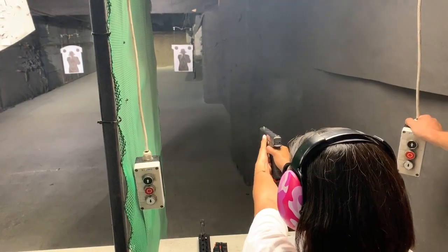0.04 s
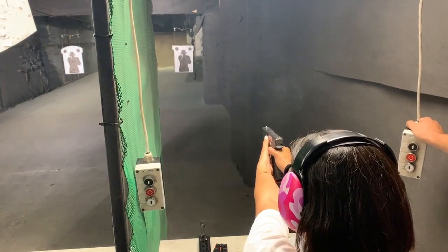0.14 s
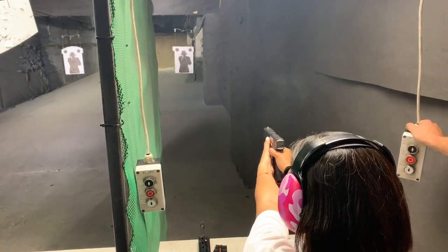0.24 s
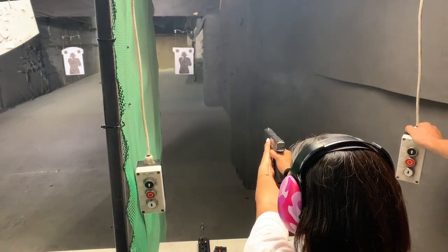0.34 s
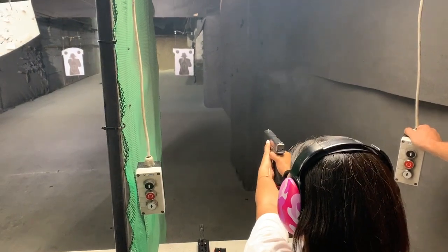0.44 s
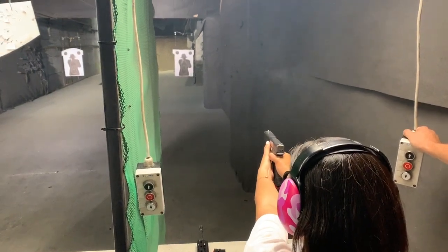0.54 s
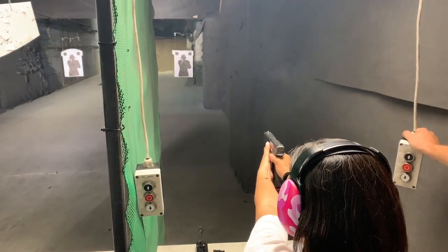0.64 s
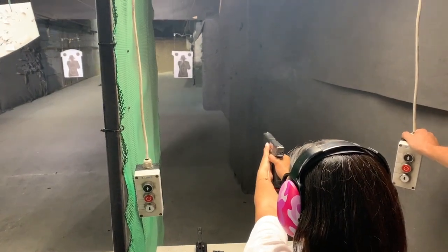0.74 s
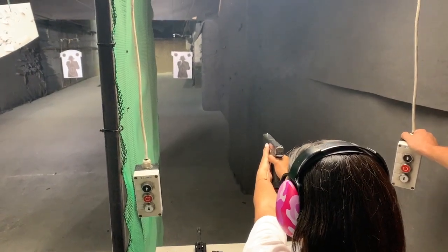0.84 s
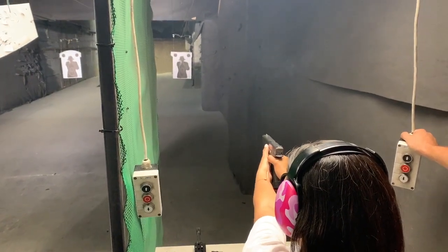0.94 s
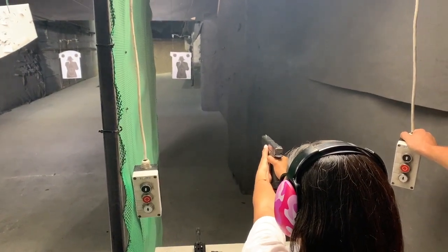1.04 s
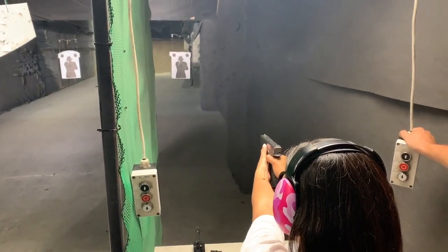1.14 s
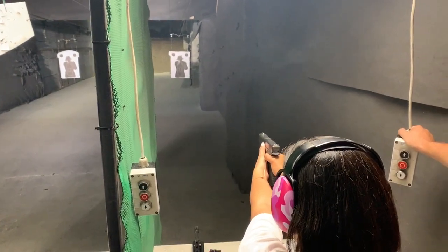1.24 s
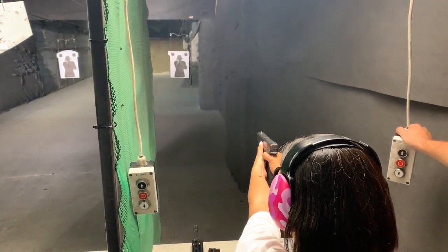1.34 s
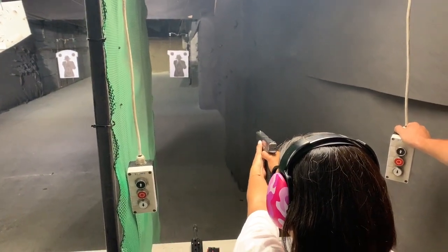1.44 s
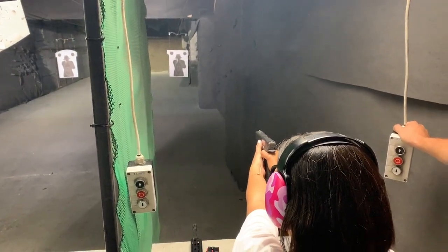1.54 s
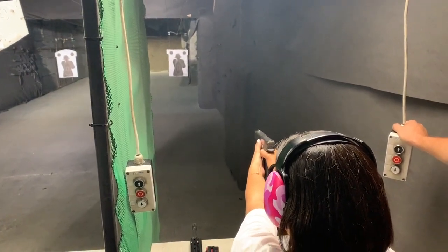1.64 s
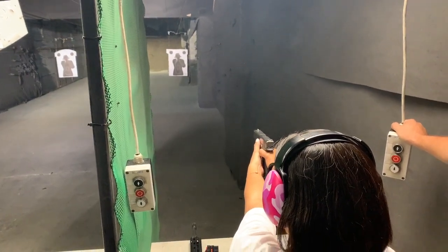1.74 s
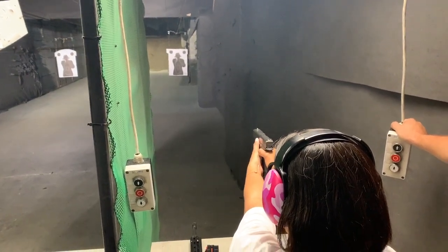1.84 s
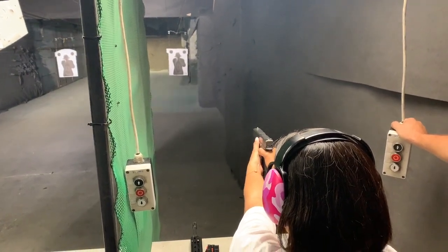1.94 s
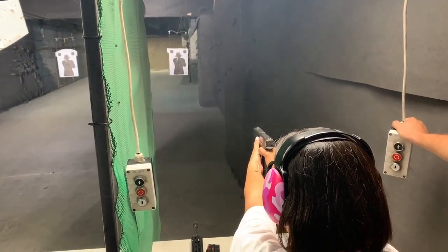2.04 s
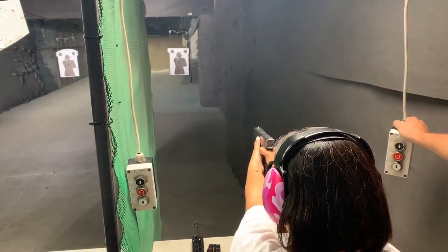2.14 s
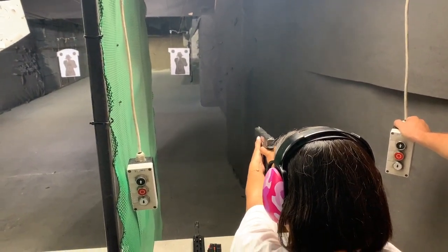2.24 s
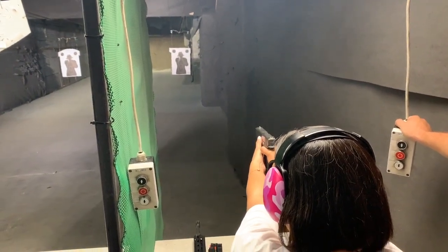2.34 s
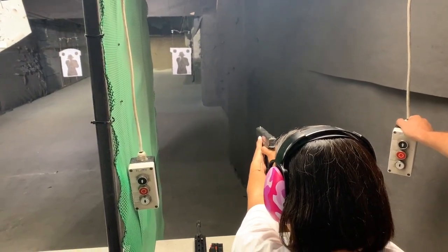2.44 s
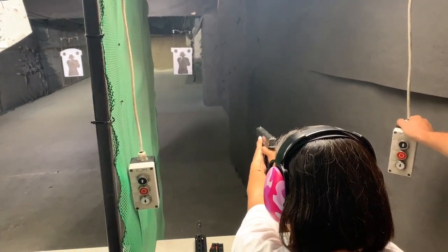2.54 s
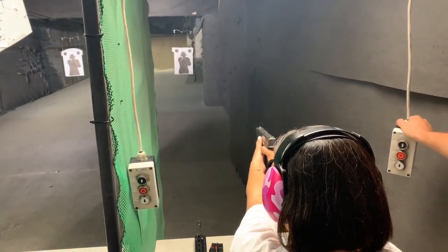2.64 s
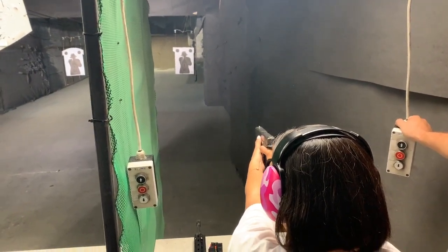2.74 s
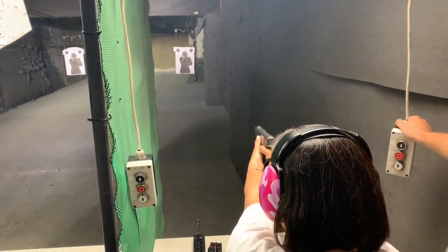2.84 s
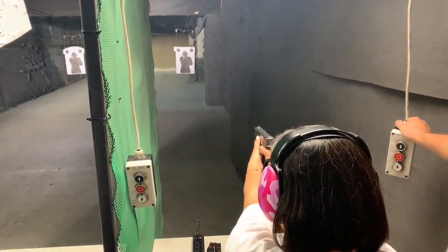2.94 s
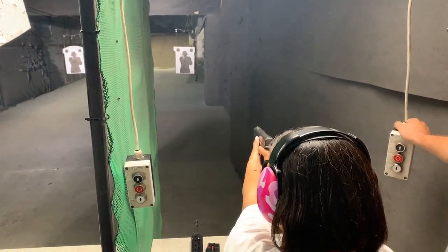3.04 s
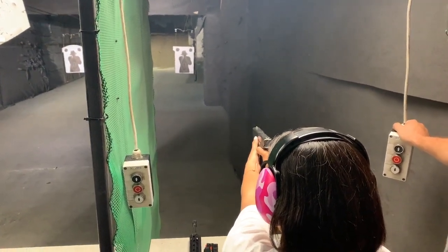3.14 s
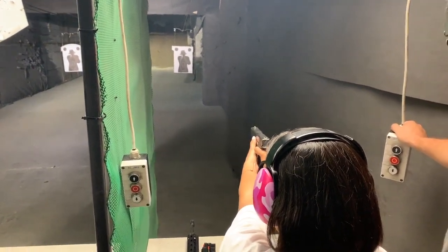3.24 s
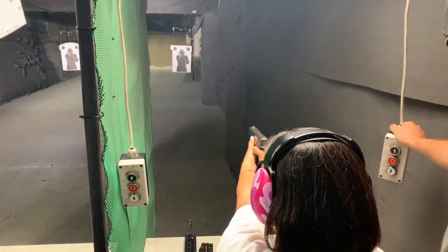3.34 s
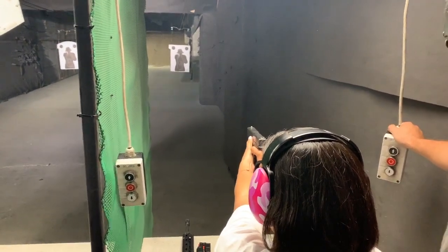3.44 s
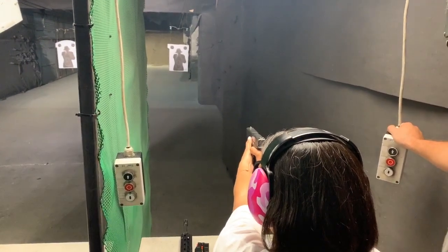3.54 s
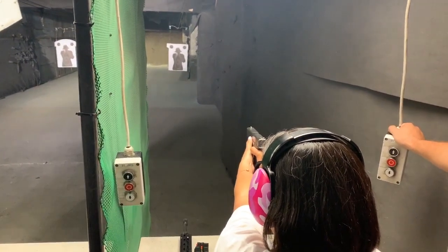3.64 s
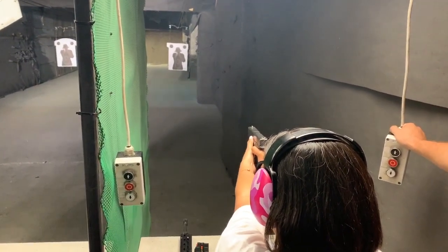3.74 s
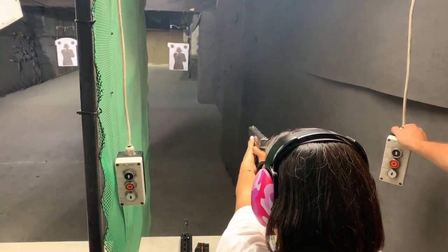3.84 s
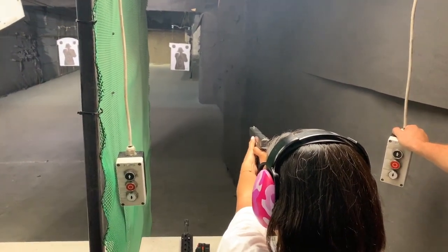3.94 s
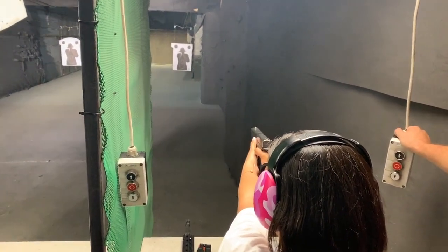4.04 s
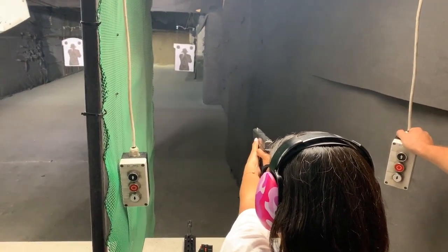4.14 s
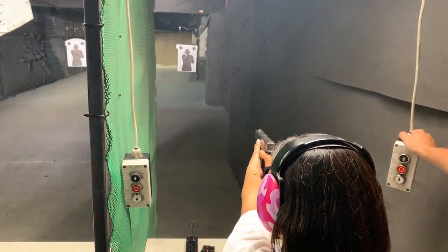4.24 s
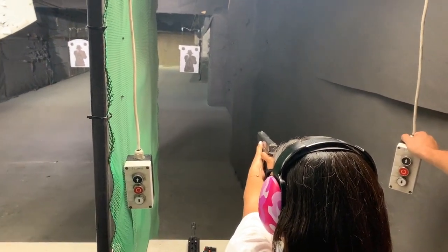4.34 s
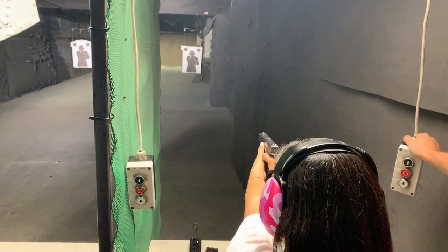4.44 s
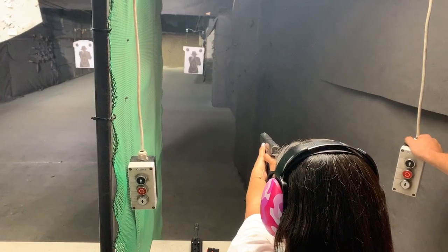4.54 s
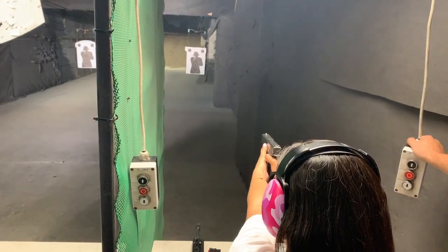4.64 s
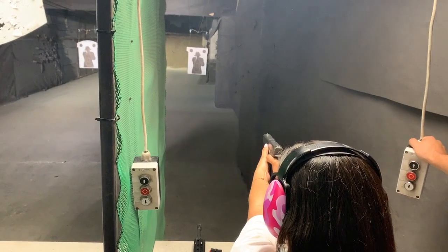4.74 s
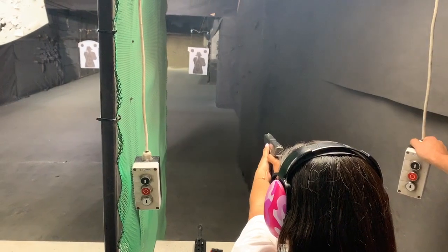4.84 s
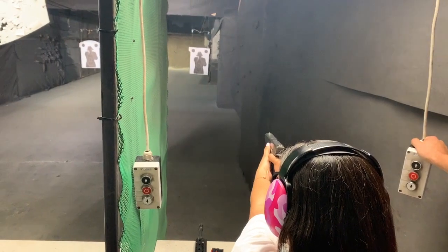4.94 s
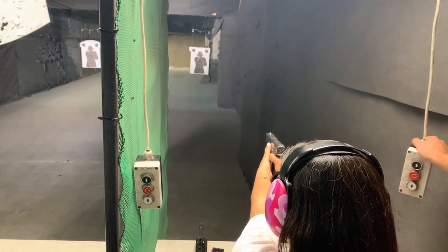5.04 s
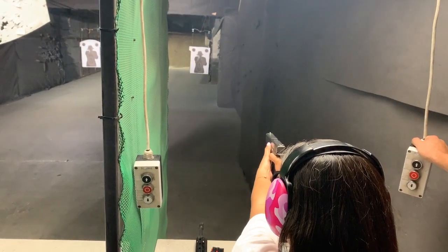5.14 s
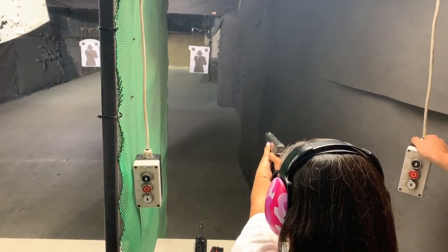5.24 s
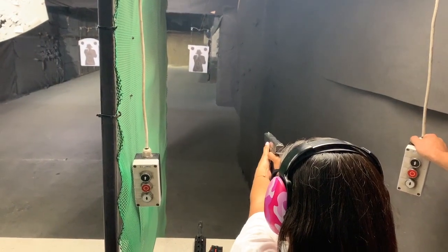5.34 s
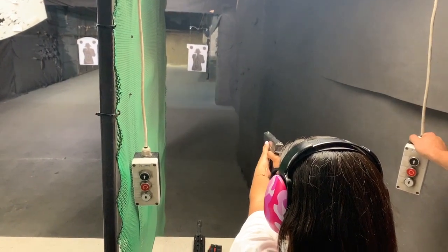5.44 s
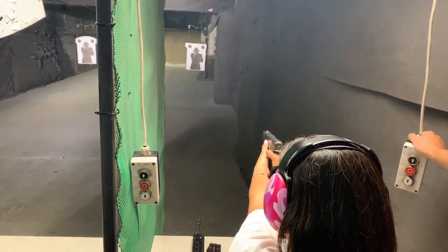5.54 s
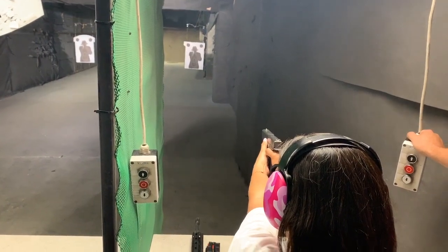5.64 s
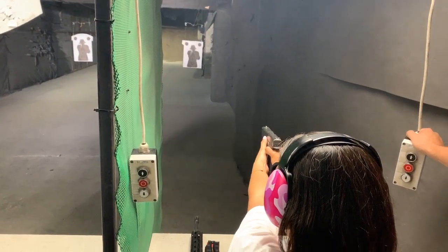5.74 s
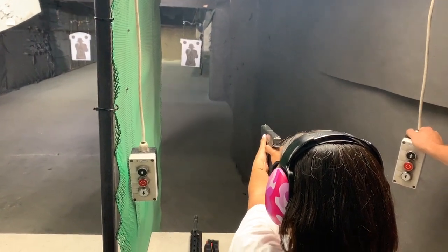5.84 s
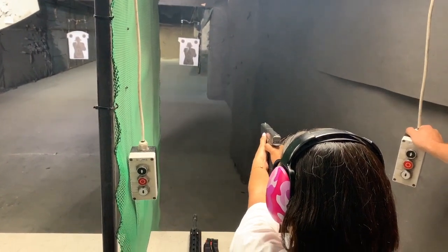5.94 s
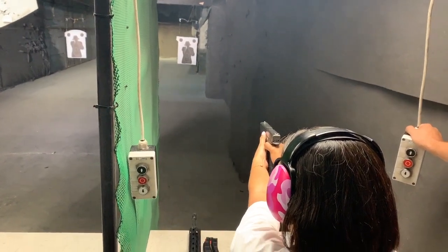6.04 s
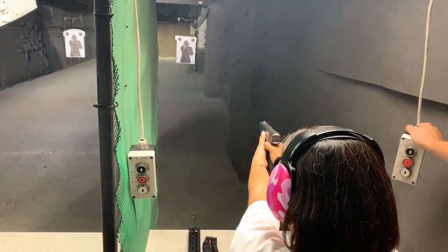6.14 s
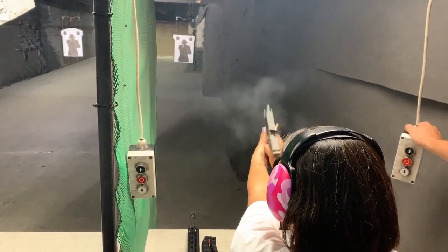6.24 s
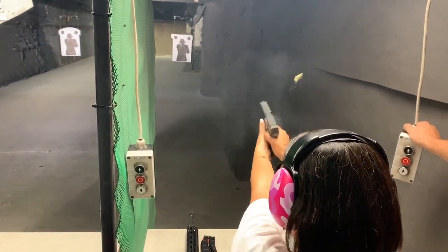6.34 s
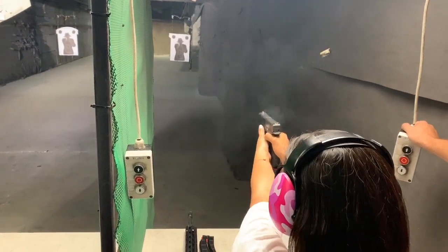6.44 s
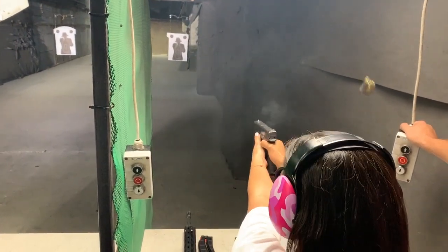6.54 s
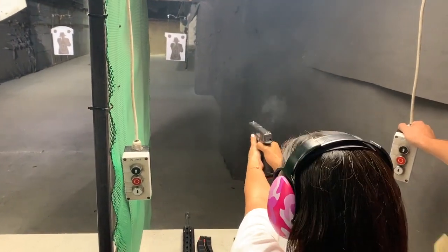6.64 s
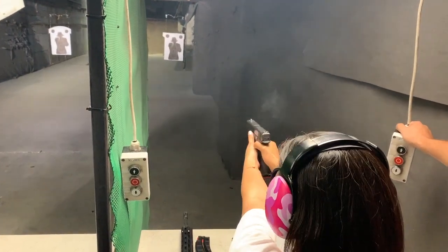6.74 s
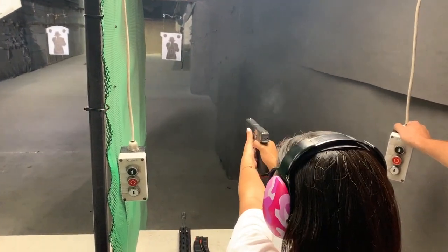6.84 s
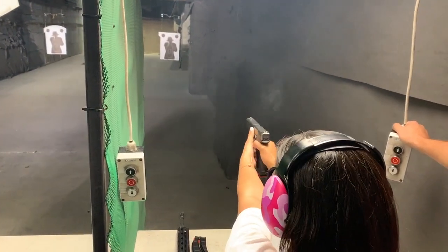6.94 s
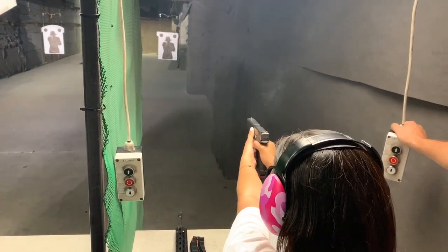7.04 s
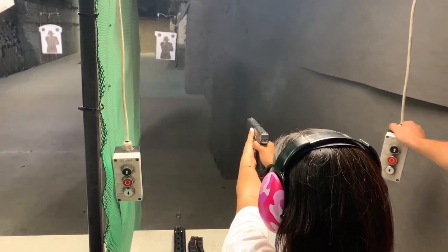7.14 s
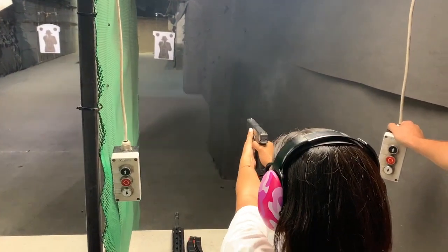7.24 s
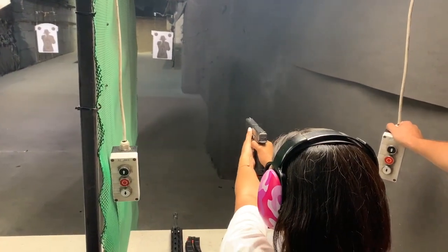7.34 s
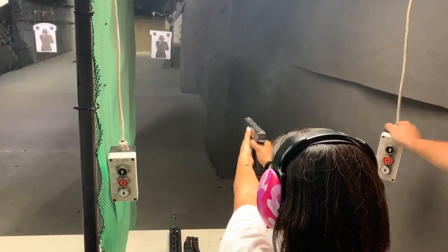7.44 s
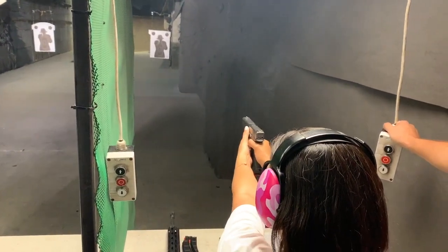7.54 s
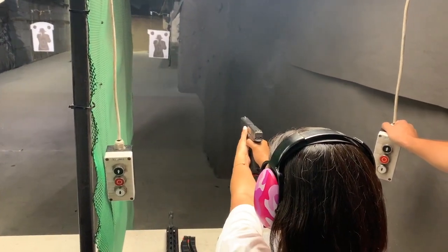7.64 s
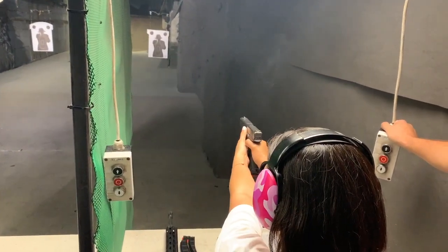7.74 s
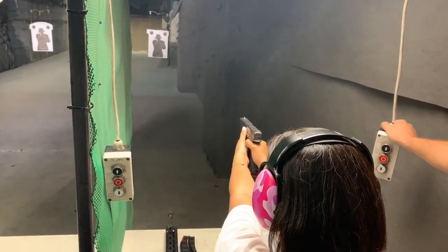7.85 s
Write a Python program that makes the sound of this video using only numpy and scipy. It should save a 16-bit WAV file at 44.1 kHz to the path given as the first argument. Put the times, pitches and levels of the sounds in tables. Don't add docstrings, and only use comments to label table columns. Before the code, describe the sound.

Pistol shots crack and overload the microphone in an indoor concrete range, each rolling into a hall echo, with brass cases tinkling over a low ventilation drone.

```python
import sys
import numpy as np
from scipy import signal
from scipy.fft import rfft, irfft
from scipy.io import wavfile
from scipy.ndimage import uniform_filter1d, minimum_filter1d

SR = 44100
rng = np.random.default_rng(int(sys.argv[2]) if len(sys.argv) > 2 else 0)


def undo_db(level):
    steps = np.asarray(level, float) / 20
    return 10 ** steps


def waveform_to_disk(signal):
    frames = np.transpose(np.atleast_2d(signal))
    scaled = np.clip(frames, -1, 1) * 32767
    samples = np.round(scaled).astype(np.int16)
    wavfile.write(sys.argv[1], SR, samples)


N = 348831

# f/Hz, level/dB per Hz
AIR_TONE = [(15, -29), (30, -12), (50, -4), (85, -6), (160, -1.5), (300, 2.5), (360, -7), (480, -14.5),
            (700, -13.5), (990, -22.5), (1130, -15), (2200, -24.5), (3200, -35), (9800, -51.5)]
# f/Hz, width/Hz, level/dB
DUCT_MODES = [(65, 12, -72), (113, 20, -62), (219, 18, -66.5), (278, 19, -59), (315, 17, -54.5),
              (530, 12, -75.5), (737, 18, -75), (910, 16, -80), (1180, 60, -78.5), (1670, 200, -77),
              (4000, 710, -80.5)]
# t/s, level over the lull/dB, length/s
AIR_SURGES = [(0.87, 8.5, 0.05), (1.16, 7.5, 0.094), (1.357, 10.5, 0.18), (1.92, 11, 0.22), (3.36, 7, 0.33),
              (3.67, 10.5, 0.14), (3.967, 8.5, 0.045), (4.39, 9.5, 0.087), (4.616, 5.5, 0.066),
              (5.152, 10.5, 0.17), (5.499, 6, 0.27), (5.79, 7.5, .12), (7.66, 12, 0.097)]
# f/Hz, likeness/0..1
PORT_LIKENESS = [(60, .93), (150, 1), (300, .88), (640, 0.3), (1400, 0.49), (2100, 0.6), (2750, 0.097),
                 (4100, .5), (4800, 0.76), (6200, 0.81), (7800, .93), (9200, .93), (10300, 0.41),
                 (11700, 0.89), (14000, 0.83)]
# f/Hz, level/dB
PORT_TILT = [(60, -2), (180, -1), (550, -2.5), (1650, -1), (4970, -1.0), (15000, 1)]
# t/s, level/dB, rise/s
BENCH_KNOCKS = [
    (0.7066, -34.5, 0.0073),
    (.7345, -45, 0.0032),
]
# f/Hz, level/dB, time to fall 60 dB/s
BENCH_MODES = [(1021, 2.5, 0.09), (1600, 9, 0.015), (1986, 8.5, 0.015), (2620, -7, 0.0106),
               (3499, -11, 0.0054), (4200, 0.5, .005), (5680, -6, 0.0037), (7500, -14, 0.0018)]
# t/s, tick level/dB, tick f/Hz, ring level/dB, ring f/Hz
BRASS_BOUNCES = [(.3620, -38, 4260, -52.5, 10550), (2.7470, -29, 8395, -36.5, 6050),
                 (2.7472, -36, 4200, -49, 4220), (3.289, -44, 9375, -47, 7450),
                 (3.2890, -44, 4100, -65, 11600), (3.634, -50, 4200, -56.5, 7480),
                 (3.791, -54.5, 3700, -72, 11530), (7.1614, -35, 13500, -47, 10850),
                 (7.4241, -36, 8340, -50, 7470), (7.4243, -46, 4330, -62, 4170),
                 (7.547, -51, 4000, -70, 10850), (7.575, -60.5, 11900, -49, 10870),
                 (7.707, -62, 8000, -74, 10800)]
# t/s, level/dB, time to fall 60 dB/s
PANEL_HIT = (2.7468, -25.5, 0.18)
# f/Hz, level/dB per Hz
PANEL_COLOUR = [(1500, -45), (2500, -22.5), (4200, -12), (5300, -12), (5900, 0), (6800, -7.5), (9900, -5.5),
                (11700, -9.5), (13000, -12), (15000, -10.5), (15900, -25)]
# f/Hz, level/dB per Hz
BOOTH_TONE = [(18, -50.5), (35, -27.5), (95, -11), (230, -8), (600, -9), (1000, -6.5), (2000, -11),
              (3000, -21.5), (4500, -16.5), (7400, -22), (10000, -24), (12600, -27.5), (15200, -32.5),
              (17000, -37.5)]
# f/Hz, fall/dB per s
BOOTH_DECAY = [(50, 117.5), (200, 94.5), (800, 110.5), (3000, 135), (8000, 161), (15000, 221.5)]
# f/Hz, level/dB per Hz
HALL_TONE = [(18, -50), (30, -23), (90, -4), (215, -6), (600, -3.5), (1320, -6.5), (2290, -14.5),
             (3200, -26), (4900, -25.5), (6900, -32), (9900, -48), (12000, -54), (14600, -64.5),
             (15600, -90)]
# f/Hz, fall/dB per s
HALL_DECAY = [(40, 24.5), (120, 29), (400, 43), (1400, 52.5), (3500, 58), (7000, 73.5), (11000, 110.5),
              (15000, 142.5)]
# settled level/dB, first level/dB, fill-up t/s, backstop echo level/dB, echo t/s
LANE_ANSWERS = [
    (-3.5, -11, .17, 2.5, .31),
    (-1, -1.5, .12, 6, .34),
]
# f/Hz, level/dB
FAR_BOOTH_COLOUR = [(300, -1), (1500, 1.5), (2300, 3), (2900, -2), (6000, -5), (10000, -1)]
# t/s, blast level/dB, lane (0 next, 1 own, 2 far booth), low hall mode level/dB, body thump level/dB
SHOT_LIST = [
    (-.5, -4, 2, -21, -9.5),
    (2.171, 1, 0, -34.5, -7),
    (6.2174, -0.5, 1, -30, -2.5),
    (6.611, 0, 0, -36, -5.5),
]


def evened(x):
    return x / np.sqrt(np.mean(x ** 2) + 1e-20)


def read(points, hz):
    f, value = np.transpose(points)
    return np.interp(np.log(hz + 1), np.log(f + 1), value)


def level(points, hz):
    gain = undo_db(read(points, hz))
    return gain / np.sqrt(np.sum(gain ** 2))


def bump(t, centre, length):
    return np.exp(-((t - centre) / length) ** 2)


def sine(hz, t):
    return np.sin(2 * np.pi * hz * t)


def filtered(x, hz, kind):
    return signal.sosfilt(signal.butter(2, hz, kind, fs=SR, output="sos"), x)


def add(mix, s, sound):
    start = round(s * SR)
    part = mix[:, max(start, 0):max(start + sound.shape[1], 0)]
    part += sound[:, max(-start, 0):][:, :part.shape[1]]


def lead(hz):
    delay_s, from_hz = .000135, 1300
    return 2 * np.pi * delay_s * np.maximum(hz - from_hz, 0)


def ports(x):
    size = len(x) + 64
    hz = np.fft.rfftfreq(size, 1 / SR)
    left = irfft(rfft(x, size) * np.exp(1j * lead(hz)), size)[:len(x)]
    return np.array([left, x])


def field(seconds, magnitude, size=512):
    hop = size // 4
    frames = int(seconds * SR) // hop + 5
    hz = np.fft.rfftfreq(size, 1 / SR)[:, None]
    a, b, c, d = rng.standard_normal((frames, len(hz), 4)).T
    same = np.clip(read(PORT_LIKENESS, hz), 0, 1)
    right = a + 1j * b
    left = same * right + np.sqrt(1 - same ** 2) * (c + 1j * d)
    left = left * np.exp(1j * lead(hz))
    lean = undo_db(read(PORT_TILT, hz) / 2)
    z = np.array([left * lean, right / lean]) * magnitude(hz, np.arange(frames) * hop / SR)
    return signal.istft(z, nperseg=size, noverlap=size - hop)[1][:, :int(seconds * SR)]


def lumps(hz, t):
    patches = rng.standard_normal((len(t), len(hz))).T
    patches = uniform_filter1d(patches, size=5, axis=0)
    patches = uniform_filter1d(patches, size=5, axis=1)
    patchy_db = 2.5
    return undo_db(patchy_db * evened(patches))


def self_noise():
    return undo_db(-85.5) * evened(filtered(rng.standard_normal((2, N)), (4400, 8600), "band"))


def ventilation():
    air_db, lull_db = -55, -5.5
    air = undo_db(air_db) * field(N / SR + .1, lambda hz, t: level(AIR_TONE, hz), size=2048)[:, :N]

    def resonances(hz, t):
        surge_db = np.max([db * bump(t, s, length) for s, db, length in AIR_SURGES], axis=0)
        main_duct = abs(hz - 300) < 60
        swell = undo_db(main_duct * (lull_db + surge_db))
        power = sum(undo_db(2 * db) * 12.0 / w / (1 + (2 * (hz - f) / w) ** 4) for f, w, db in DUCT_MODES)
        return swell * np.sqrt(power)

    return air + field(N / SR + .1, resonances, size=4096)[:, :N]


def knocks():
    out, t = np.zeros((2, N)), np.arange(SR // 2) / SR
    body = sum(undo_db(db - 60 * t / t60) * sine(hz, t) for hz, db, t60 in BENCH_MODES)

    def tail_shape(f, u):
        return undo_db(-15 - 60 * u / .5) * f ** 4 / (f ** 4 + 900 ** 4) / (1 + (f / 1600) ** 2)

    for s, db, rise in BENCH_KNOCKS:
        push = rng.standard_normal(len(t)) * (t / rise) ** 2 * np.exp(-(t / rise) ** 2)
        ring = filtered(signal.fftconvolve(push, body)[:len(t)], 850, "high")
        ring = ring / abs(ring).max() * 2
        tail = field(.5, tail_shape, size=256) * np.minimum(t / 0.022, 1)
        add(out, s, undo_db(db) * (ring + tail))
    return out


def panel():
    out, t = np.zeros((2, N)), np.arange(SR // 2) / SR
    s, db, t60 = PANEL_HIT

    def shape(f, u):
        quick = undo_db(db - 60 * u / t60)
        slow = undo_db(db - 11.5 - 60 * u / (.9 - f / 30000))
        return level(PANEL_COLOUR, f) * (quick + slow)

    add(out, s, field(.5, shape, size=256) * np.cos(np.pi * t))
    return out


def brass():
    out, t = np.zeros((2, N)), np.arange(SR // 2) / SR
    longest_t60_s, best_hz, slope = 0.7, 6200, 1.6
    for s, tick_db, tick_hz, ring_db, hz in BRASS_BOUNCES:
        burst = undo_db(tick_db + 1 - 60 * t / 0.011) * rng.standard_normal(len(t))
        edges = [tick_hz * .76, min(tick_hz * 1.3, 16500)]
        tick = filtered(burst, edges, "band") + undo_db(-19.5) * burst

        t60 = longest_t60_s * np.exp(-slope * abs(np.log(hz / best_hz)))
        spread = 1 + .005 * rng.standard_normal(12)
        blurred = np.sin(2 * np.pi * (hz * t[:, None] * spread + rng.random(12))).sum(1) / 4
        tube = undo_db(-60 * t / t60) * (blurred + 0.65 * sine(hz, t)) * np.cos(np.pi * t)
        upper = undo_db(-23.5 - 60 * t / 0.2) * (.3 * sine(14900, t) + sine(11600, t))
        ring = undo_db(ring_db) * (tube + upper)

        def echo_shape(f, u):
            return undo_db(tick_db - 32.5 - 60 * u / 0.21) / (1 + (np.log((f + 1) / tick_hz) / 0.47) ** 2)

        echo = field(.5, echo_shape, size=128) * np.minimum(t / 0.002985, 1)
        add(out, s, tick + ports(ring) + echo)
    return out


def lane(settled_db, first_db, fill_s, echo_db, echo_s):
    booth_db, hall_db = 3, -18
    filling_s, echo_length_s = .03, .07

    def booth_shape(hz, t):
        return level(BOOTH_TONE, hz) * undo_db(booth_db - read(BOOTH_DECAY, hz) * t) * lumps(hz, t)

    def slap_shape(hz, t):
        return level(HALL_TONE, hz) * undo_db(-5) * bump(t, .062, .022)

    def hall_shape(hz, t):
        return level(HALL_TONE, hz) * undo_db(hall_db - read(HALL_DECAY, hz) * (t - 0.3347)) * lumps(hz, t)

    booth = field(1.8, booth_shape)
    add(booth, 0, field(.2, slap_shape))
    hall = field(1.8, hall_shape, size=1024)
    t = np.arange(booth.shape[1]) / SR
    filled = 1 / (1 + np.exp((fill_s - t) / filling_s))
    swell_db = first_db + (settled_db - first_db) * filled + echo_db * bump(t, echo_s, echo_length_s)
    u = t / 0.00035
    blast = undo_db(4.5) * (1 - u) * np.exp(-u)
    return blast + np.minimum(t / 0.00048, 1) * (booth + hall * undo_db(swell_db))


def hiss_ahead():
    length = 1320
    before = np.arange(length) / SR - length / SR

    def shape(f, u):
        patches_db = 6 * np.repeat(rng.standard_normal(len(f)), 3)[:len(f), None]
        return level(BOOTH_TONE, f) * undo_db(f / 1600 + patches_db) / (1 + (f / 7900) ** 30) + 0 * u

    hiss = field(.04, shape, size=256)[:, :length]
    return before[0], hiss * undo_db(-20 + 1000 * before) * np.minimum((1 + before / 0.039) * 4, 1)


def shots():
    out, t = np.zeros((2, N)), np.arange(2 * SR) / SR
    lanes = [lane(*row) for row in LANE_ANSWERS]
    own = lanes[1]
    colour = undo_db(read(FAR_BOOTH_COLOUR, np.fft.rfftfreq(2 * SR, 1 / SR)))
    lanes.append(irfft(rfft(own, 2 * SR) * colour)[:, :own.shape[1]])
    for s, db, which, mode_db, thump_db in SHOT_LIST:
        add(out, s, undo_db(db) * lanes[round(which)])
        turns = 60 * t + 1.4 * (1 - np.exp(-t / .02))
        thump = undo_db(thump_db - 60 * t / 0.17) * np.sin(2 * np.pi * turns) * np.minimum(t / 0.01, 1)
        mode = undo_db(mode_db - 31 * t) * sine(64, t) * np.minimum(t / .05, 1)
        add(out, s, (thump + mode) * np.ones((2, 1)))
        offset_s, hiss = hiss_ahead()
        add(out, s + offset_s, hiss)
    return out


def scene():
    return self_noise() + ventilation() + knocks() + panel() + brass() + shots()


def thin_treble(x):
    hz, _, z = signal.stft([x[0] + x[1], x[0] - x[1]], SR, nperseg=1024)
    hz = hz[:, None]
    power = uniform_filter1d(abs(z) ** 2, size=9, axis=1)
    power = uniform_filter1d(power, size=3, axis=2)
    calm = power.sum((0, 1)) < undo_db(-2 * 5)
    margin_db = np.where((hz > 11250) & calm, 2, 8.5)
    weak = (power < power[::-1] * undo_db(-2 * margin_db)) & (hz > 4300)
    above = -minimum_filter1d(-power.max(0), size=51, axis=0, origin=-25)
    weak[0] |= (power[0] < above * undo_db(-2 * 19)) & (abs(hz - 5000) < 560)
    masked_db = np.maximum(-103, 10 * np.log10(power.max((0, 1)) + 1e-20) - 56)
    faint = (power < undo_db(2 * masked_db + 30 * (hz > 15250))) & (hz > 8300)
    gain = np.where(weak | faint, undo_db(-29), 1)
    mid, side = signal.istft(z * gain, SR, nperseg=1024)[1][:, :N]
    return np.array([mid + side, mid - side]) / 2


def low_pass(x):
    return signal.sosfilt(signal.butter(12, 16110, fs=SR, output="sos"), x)


def record(dry):
    heard = filtered(dry, 36, "high")
    flat = heard / (1 + abs(heard) ** 8) ** (1 / 8)
    mix = thin_treble(flat)
    return low_pass(mix)


dry = scene()
out = record(dry)
waveform_to_disk(out)
```